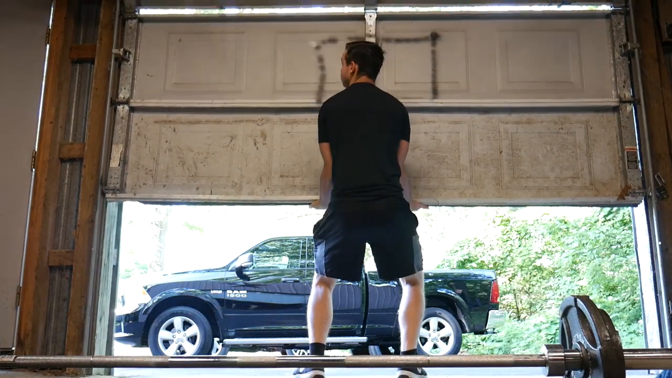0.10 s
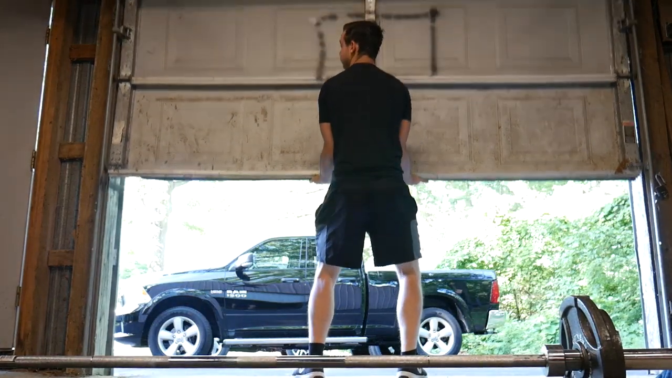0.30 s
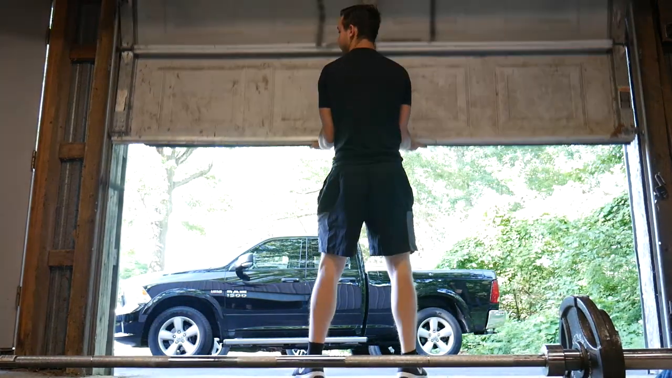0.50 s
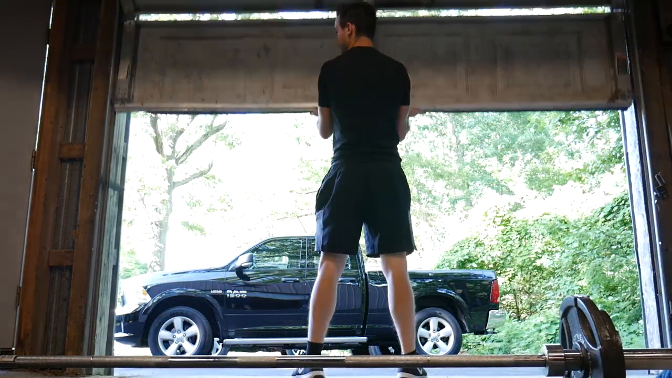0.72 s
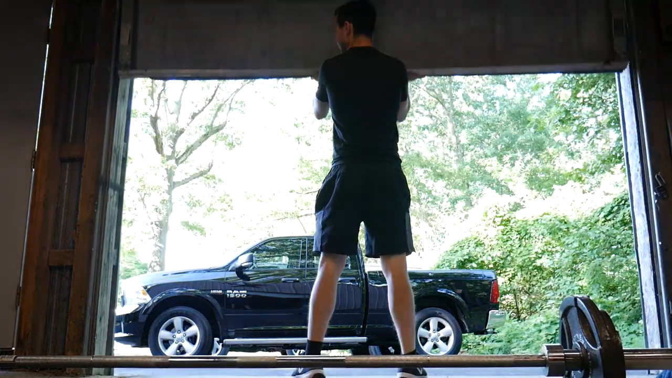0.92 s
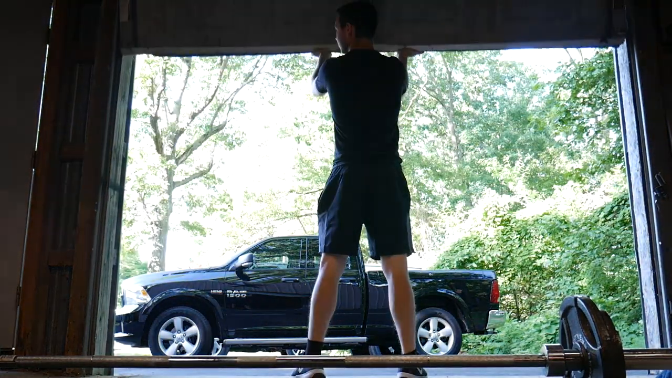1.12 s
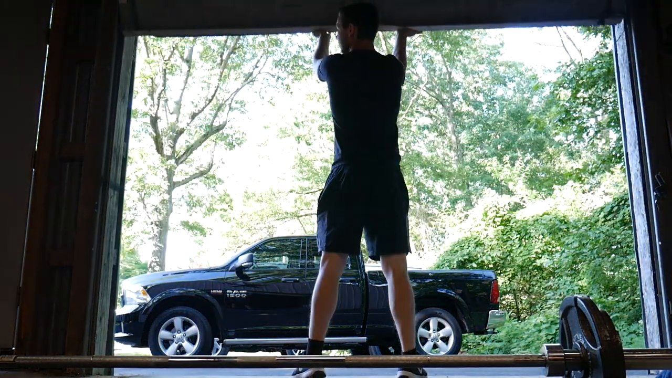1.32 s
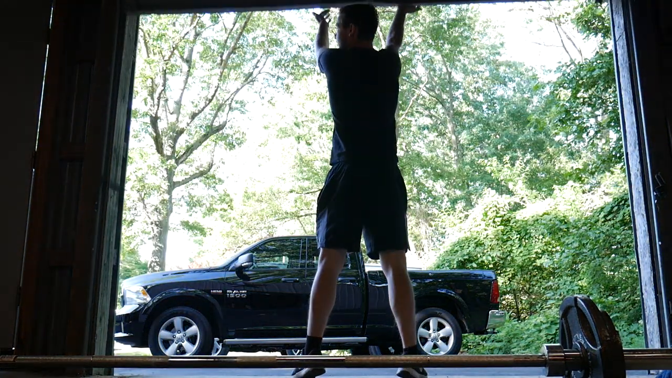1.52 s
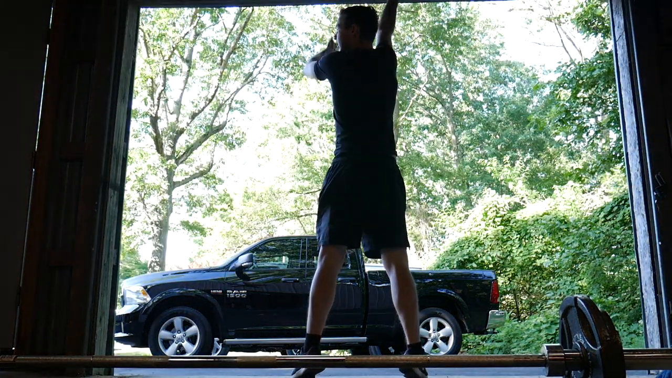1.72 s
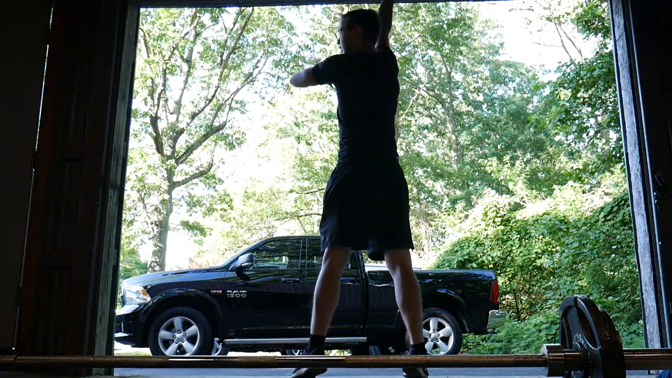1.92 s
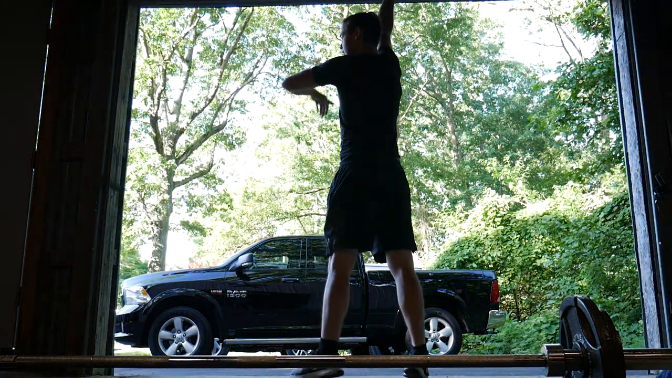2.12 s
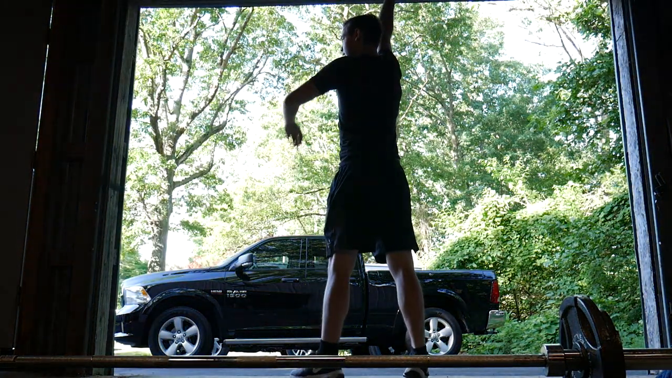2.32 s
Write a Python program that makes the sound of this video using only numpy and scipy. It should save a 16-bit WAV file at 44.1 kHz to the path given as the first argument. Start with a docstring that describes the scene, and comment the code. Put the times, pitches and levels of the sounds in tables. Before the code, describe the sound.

Garage door rolling open along metal tracks, its hinges clacking before a sharp steel clang.

```python
"""A sectional garage door is pushed up by hand, heard from inside the garage over faint outdoor air.
First the steel rollers begin to chatter, exciting the modes of their tracks, and the door groans briefly.
Then hinges clack, a roller scrapes, and the panels rumble and thud as they fold through the bend.
Near the top one loud steel clang rings out. Last, the door settles with a few knocks;
light, dry ticks sound close by, perhaps clothing or a foot."""
import sys
import numpy as np
from scipy import signal
from scipy.fft import rfft, irfft
from scipy.io import wavfile

SR = 44100
rng = np.random.default_rng(int(sys.argv[2]) if len(sys.argv) > 2 else 0)


def int16_out(signal):
    """Quantize to a 16-bit WAV file."""
    q = np.round(np.clip(np.atleast_2d(signal).T, -1, 1) * 32767)
    wavfile.write(sys.argv[1], SR, q.astype(np.int16))


N = 105840

# Envelope of the rolling: t/s, level/dB
ROLLING_ENVELOPE = [(0, -33.5), (.12, -30.5), (.25, -20), (.38, -17), (.52, -15.5), (.63, -15), (.74, -15),
                    (.87, -16), (.97, -17.5), (1.08, -19.5), (1.22, -22.5), (1.39, -24.5), (1.55, -20.5),
                    (1.65, -20), (1.74, -27.5), (1.93, -36), (2.2, -44.5), (2.4, -47)]
# Spectrum of the roller chatter: f/Hz, relative level/dB
CHATTER_SPECTRUM = [(100, -25), (250, -6), (400, -5.5), (600, -3), (820, 1), (1200, -2), (1900, -3),
                    (3200, -7), (5000, -12), (7500, -16.5), (9200, -18), (10200, -22.5), (15000, -30.5)]
# Normal modes of the track: f/Hz, relative level/dB, T60/s
TRACK_MODES = [(792, 2, 0.36), (818, -9, 0.23), (666, -14, 0.26), (920, -14, .2), (1004, -7.5, 0.28),
               (1090, -7.5, 0.18), (527, -9.5, 0.17), (328, -17.5, 0.35)]
# Normal modes of the steel that clangs: f/Hz, relative level/dB, T60/s
STEEL_MODES = [(1502, -4, 0.18), (2014, -0.5, 0.33), (2080, 5, 0.12), (2164, 3, 0.14), (2223, 2, 0.13),
               (2360, -4, 0.17), (2394, 1.5, 0.12), (2570, 3, 0.24), (2850, -17, 0.35), (3810, -10.5, 0.58),
               (3800, -4, 0.4), (3850, -9, 0.53), (4000, -12, .3), (5475, -9, 0.24)]
# Spectrum of the crash that starts the clang: f/Hz, relative level/dB
CLANG_SPECTRUM = [(60, -31), (500, -14.5), (1000, -2.5), (1500, -5), (1800, -3.5), (2150, -0.5),
                  (2700, -6.5), (4000, -4.5), (6000, -10.5), (8500, -13), (10500, -20.5), (15000, -32)]
# Hinge and roller impacts: t/s, level/dB, tilt/(dB per octave), rattle length/s
CLACKS = [(0.033, -22.5, 0, 0.018), (0.4547, -13, 2.5, 0.013), (.49, -15.5, 0.5, .05),
          (0.562, -16.5, 1.5, 0.011), (0.771, -12.5, 1.5, 0.016), (0.803, -12.5, 2, 0.0087),
          (0.831, -10, -0.2, 0.023), (0.992, -12, 1, 0.015), (1.029, -9.5, 0.1, 0.031),
          (1.159, -17, 0.5, 0.0089), (1.326, -26, 15, 0.013), (1.42, -20.5, -0.5, .02),
          (1.456, -21.5, 3.5, 0.045), (1.51, -15, 0, 0.017), (2.039, -24, 2.5, .005),
          (2.2468, -29.5, 11, 0.0089), (2.2524, -22.5, 0.4, .025)]
# Spectrum of a clack: f/Hz, relative level/dB
CLACK_SPECTRUM = [(60, -49), (300, -6), (650, 0.5), (1500, 3), (2200, -1.5), (3500, -3), (5500, -7.5),
                  (7500, -13), (9200, -15), (10500, -21.5), (15000, -30.5)]
# Scrapes of a roller in the bend: t/s, level/dB
SCRAPES = [(.989, -20.5), (1.03, -21.5)]
# Spectrum of a scrape: f/Hz, relative level/dB
SCRAPE_SPECTRUM = [(1000, -33), (4000, -14), (5400, 10), (6600, -4), (7600, -24), (15000, -33)]
# Envelope of the panel rumble: t/s, level/dB
RUMBLE_ENVELOPE = [(0, -47), (.3, -36), (.5, -33.5), (.75, -37), (.86, -27), (1.05, -39), (1.35, -29.5),
                   (1.5, -35.5), (1.58, -25.5), (1.85, -34), (2.05, -45), (2.4, -56)]
# Thuds of the folding panels: t/s, level/dB
THUDS = [(.615, -28.5), (0.836, -23.5), (1.014, -21.5), (1.927, -34)]
# Spectrum of the panel vibration: f/Hz, relative level/dB
PANEL_SPECTRUM = [(20, -35), (45, -23), (75, -14), (130, -3.5), (175, 0), (280, -8.5), (500, -7.5),
                  (1000, -31.5), (3000, -37)]
# Light, dry ticks close by, perhaps clothing or a foot: t/s, level/dB
TICKS = [(2.0825, -32.5), (2.126, -36), (2.155, -37)]
# Spectrum of the outdoor air: f/Hz, relative level/dB
AIR_SPECTRUM = [(25, -11), (150, -2), (400, -3.5), (800, 6), (2000, -12.5), (6000, -24), (15000, -39)]
# Reverberation time of the garage: f/Hz, T60/s
GARAGE_T60 = [(150, 0.23), (600, 0.77), (1500, 0.57), (4000, 0.41), (10000, 0.35)]
# Stereo width: f/Hz, side level re mid/dB
SIDE_SPECTRUM = [(50, -16), (200, -22), (600, -26), (2000, -23.5), (5000, -19), (12000, -16)]

ROLL_DB, FRICTION_DB, TRACK_RING_DB = -0.15, -8.5, -8.5
UNEVEN_DB, TREBLE_HZ, TREBLE_DB_PER_DB = 1.5, 2460, -0.17
CLANG_S, CLANG_DB, CLANG_RING_DB = 1.6972, -4.5, -6.5
CLACK_STEEL_DB, CLACK_TRACK_DB = -12, -8  # ringing re each clack
GROAN_PEAK_S, GROAN_HALF_WIDTH_S, GROAN_HZ, GROAN_DB = 0.423, 0.051, 329.4, -24.5
RUMBLE_DB, TICK_CLOSE_DB, AIR_DB = 1, -12, -39.5
DIRECT_DB, ROOM_BUILD_S = -6, 0.001  # direct level re reverberation; rise time of the tail
BLOW_SAMPLES, BLOW_WINDOW_S = 30000, 0.023
TIME, BLOW_TIME = np.arange(N) / SR, np.arange(BLOW_SAMPLES) / SR


def roller():
    """Rolling contact: tiny impacts and friction make a chatter and force the track's modes to vibrate."""
    impacts = unit(contacts(per_s=170, spread_db=2, size=N))
    friction = undb(FRICTION_DB) * rng.standard_normal(N)
    drive = (impacts + friction) * undb(UNEVEN_DB * wander(per_s=22))  # the roller presses unevenly
    chatter = unit(colour(drive, CHATTER_SPECTRUM))
    track = unit(convolve(drive, ring(TRACK_MODES)))
    effort = envelope(ROLLING_ENVELOPE)
    treble = signal.sosfilt(signal.butter(1, TREBLE_HZ, "high", fs=SR, output="sos"), chatter)
    treble_gain = (effort / effort.max()) ** TREBLE_DB_PER_DB  # treble fades less than the rest
    chatter = chatter + treble * (treble_gain - 1)
    return in_garage(chatter * effort) + undb(TRACK_RING_DB) * track * effort


def rollers(count):
    """Incoherent sources add in power, so the sum of the rollers is divided by the root of their count."""
    return undb(ROLL_DB) * sum(roller() for _ in range(count)) / np.sqrt(count)


def clang():
    """Impact excitation: a hard blow gives a broadband crash and leaves the steel in free vibration."""
    crash = blow(colour(rattle(length_s=0.022), CLANG_SPECTRUM), CLANG_S, CLANG_DB)
    return in_garage(crash) + blow(ring(STEEL_MODES), CLANG_S, CLANG_RING_DB)


def clacks(places):
    """Backlash: hinges and rollers knock in their play along the door; steel and track ring faintly."""
    knocks = [blow(colour(rattle(length), CLACK_SPECTRUM, tilt), start, db)
              for start, db, tilt, length in CLACKS]
    steel, track = ring(STEEL_MODES), ring(TRACK_MODES)
    ringing = sum(blow(steel, start, db + CLACK_STEEL_DB) + blow(track, start, db + CLACK_TRACK_DB)
                  for start, db, _, _ in CLACKS)
    return ringing + sum(in_garage(sum(knocks[place::places])) for place in range(places))


def scrapes():
    """Sliding friction: a roller's rim grazes the track in two short, shrill bursts."""
    grazes = sum(blow(colour(rattle(length_s=0.016), SCRAPE_SPECTRUM), start, db) for start, db in SCRAPES)
    return in_garage(grazes)


def panels():
    """Plate vibration: the wide panels radiate a low rumble as they shake and damped thuds as they fold."""
    shaking = unit(colour(rng.standard_normal(N), PANEL_SPECTRUM))
    rumble = undb(RUMBLE_DB) * shaking * envelope(RUMBLE_ENVELOPE)
    thuds = sum(blow(colour(noise_burst(t60=0.4), PANEL_SPECTRUM), start, db) for start, db in THUDS)
    return rumble + thuds


def groan():
    """Amplitude modulation: a low pure tone swells and fades as the door gathers speed."""
    swell = np.exp(-((TIME - GROAN_PEAK_S) / GROAN_HALF_WIDTH_S) ** 2)
    return undb(GROAN_DB) * swell * np.sin(2 * np.pi * GROAN_HZ * TIME)


def ticks():
    """Direct-to-reverberant ratio: extra direct sound makes these light, bright ticks seem close."""
    direct = sum(blow(colour(rattle(length_s=0.0044), CLACK_SPECTRUM, tilt_db=5.5), start, db)
                 for start, db in TICKS)
    return undb(TICK_CLOSE_DB) * direct + in_garage(direct)


def outdoor_air():
    """Stationary noise: the outdoor air is a faint, steady hush."""
    return undb(AIR_DB) * unit(colour(rng.standard_normal(N), AIR_SPECTRUM))


def in_garage(x):
    """Reverberation: direct sound from one place, then a diffuse tail that lasts longest in the midrange."""
    noise = rfft(rng.standard_normal(BLOW_SAMPLES))
    hz = np.arange(len(noise)) * SR / BLOW_SAMPLES
    centres, decay_times = np.array(GARAGE_T60).T
    tail = 0
    for t60, weights in zip(decay_times, np.eye(len(centres))):
        band = on_log_axis(list(zip(centres, weights)), hz)
        tail = tail + irfft(noise * band) * decay(t60)
    tail = tail * (1 - np.exp(-BLOW_TIME / ROOM_BUILD_S))
    direct = undb(DIRECT_DB)
    return (direct * x + convolve(x, tail / np.linalg.norm(tail))) / np.hypot(1, direct)


def stereo_width(x):
    """Decorrelation: a faint, scattered copy, added left and subtracted right, widens the sound slightly."""
    scatter = noise_burst(t60=0.1)
    return convolve(x, colour(scatter / np.linalg.norm(scatter), SIDE_SPECTRUM))


def rattle(length_s, first_touch=0.24):
    """Contact bounce: one part strikes another, then buzzes against it with dying strength."""
    buzz = contacts(per_s=4000, spread_db=4.5, size=BLOW_SAMPLES) * np.exp(-2 * BLOW_TIME / length_s)
    return buzz / (np.linalg.norm(buzz) + 1e-9) + first_touch * signal.unit_impulse(BLOW_SAMPLES)


def contacts(per_s, spread_db, size):
    """Poisson process: tiny independent impacts, most weak and a few strong."""
    strengths = undb(spread_db * np.minimum(rng.exponential(size=size), 4))
    struck = rng.random(size) < per_s / SR
    return struck * strengths * rng.choice([-1, 1], size)


def ring(modes):
    """Modal superposition: a tapped body vibrates as a sum of damped sinusoids."""
    return sum(undb(db) * decay(t60) * np.sin(2 * np.pi * (hz * BLOW_TIME + rng.random()))
               for hz, db, t60 in modes)


def blow(x, start, db):
    """Equivalent level: a transient is placed in time, with db its energy spread over BLOW_WINDOW_S."""
    x = x * undb(db) * np.sqrt(BLOW_WINDOW_S * SR / np.sum(x ** 2))
    return np.pad(x, (int(start * SR), N))[:N]


def colour(x, spectrum, tilt_db=0):
    """Minimum-phase filtering to a given spectrum, tilted by tilt_db per octave."""
    size, pivot_hz = 4096, 2000
    hz = np.arange(size // 2 + 1) * SR / size
    db = on_log_axis(spectrum, hz) + tilt_db * np.log2(np.maximum(hz, 200) / pivot_hz)
    cepstrum = irfft(np.log(undb(db)))
    cepstrum[1:size // 2] *= 2  # folding the cepstrum makes the filter causal
    cepstrum[size // 2 + 1:] = 0
    return convolve(x, irfft(np.exp(rfft(cepstrum))))


def convolve(x, response):
    """Convolution: the output of a linear system with this impulse response."""
    return signal.fftconvolve(x, response)[:len(x)]


def noise_burst(t60):
    """White noise under exponential damping."""
    return rng.standard_normal(BLOW_SAMPLES) * decay(t60)


def decay(t60):
    """Exponential damping: the level falls 60 dB in t60 seconds."""
    return np.exp(-np.log(1000) * BLOW_TIME / t60)


def wander(per_s):
    """Random modulation: straight glides between values of unit variance."""
    values = rng.uniform(-1, 1, size=256) * np.sqrt(3)
    return np.interp(TIME * per_s, np.arange(len(values)), values)


def envelope(rows):
    """Amplitude envelope interpolated from rows of t/s, level/dB."""
    return undb(np.interp(TIME, *np.array(rows).T))


def on_log_axis(rows, hz):
    """Interpolation in log frequency between rows of f/Hz, value."""
    frequencies, values = np.array(rows, float).T
    return np.interp(np.log(hz + 1), np.log(frequencies), values)


def undb(db):
    """Amplitude ratio of a level in decibels."""
    return 10 ** (np.asarray(db) / 20)


def unit(x):
    """Normalisation to an rms of 1."""
    return x / np.sqrt(np.mean(x ** 2))


def scene():
    """Superposition: all sources add in the middle, and a weak side signal leaves the sound almost mono."""
    air = outdoor_air()
    mid = rollers(count=3) + clacks(places=4) + scrapes() + clang() + ticks() + panels() + groan() + air
    side = stereo_width(mid)
    return np.array([mid + side, mid - side])


def record(dry):
    """Soft saturation rounds the loudest peaks, and a low-pass filter cuts the highest treble."""
    ceiling, cutoff_hz = 0.81, 15600
    rounded = dry / (1 + (dry / ceiling) ** 8) ** (1 / 8)
    return signal.sosfilt(signal.ellip(10, .2, 70, cutoff_hz, fs=SR, output="sos"), rounded)


dry = scene()
out = record(dry)
int16_out(out)
```